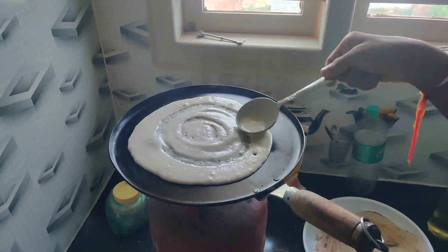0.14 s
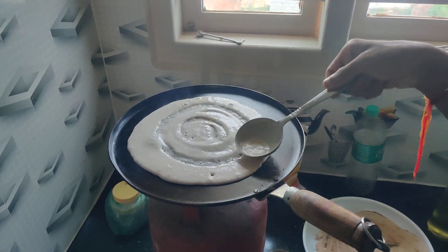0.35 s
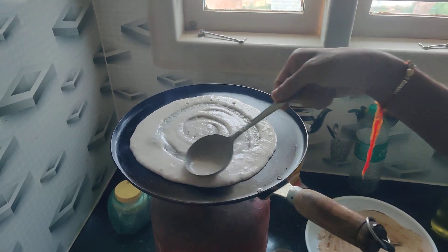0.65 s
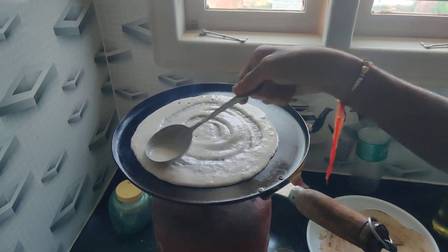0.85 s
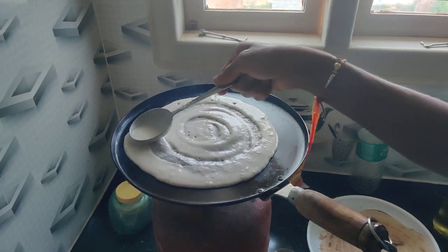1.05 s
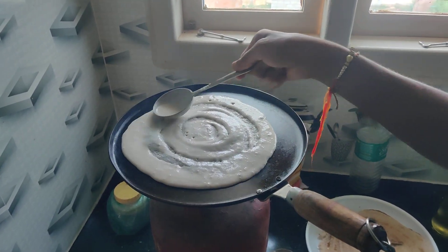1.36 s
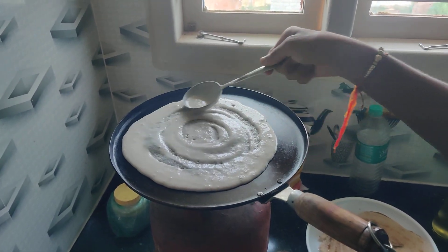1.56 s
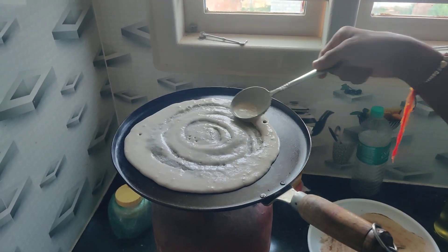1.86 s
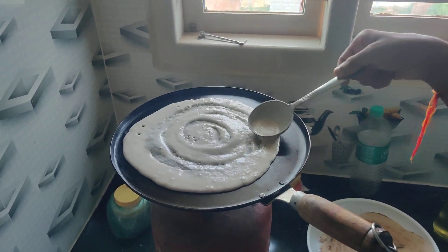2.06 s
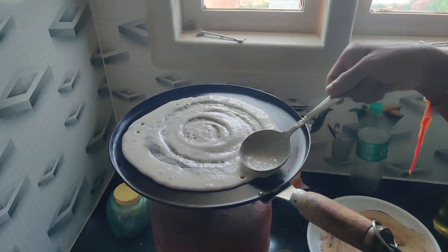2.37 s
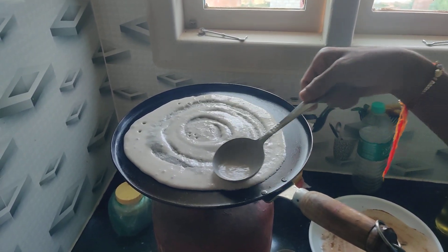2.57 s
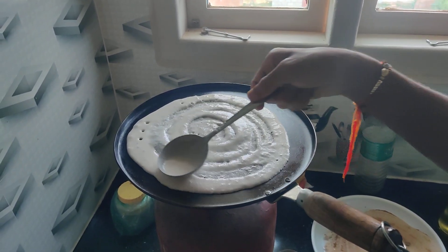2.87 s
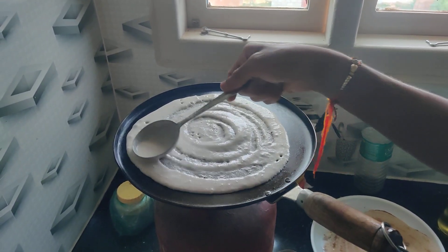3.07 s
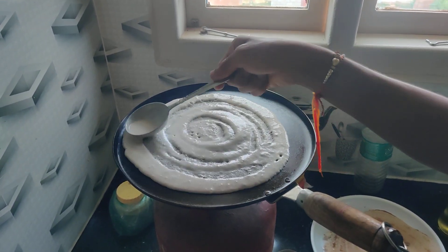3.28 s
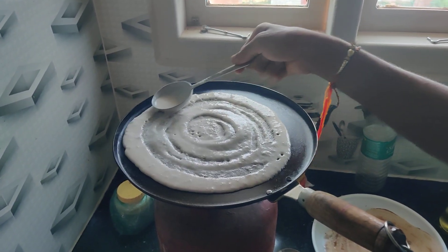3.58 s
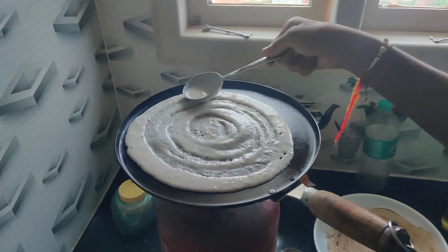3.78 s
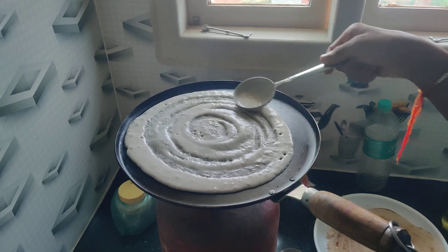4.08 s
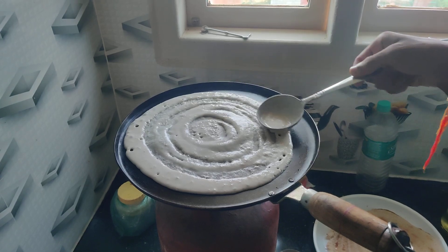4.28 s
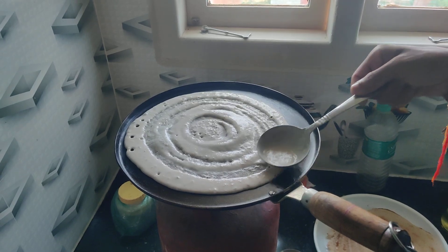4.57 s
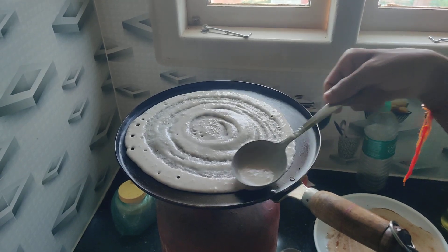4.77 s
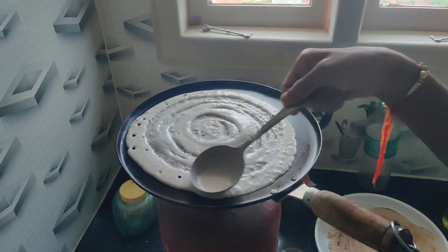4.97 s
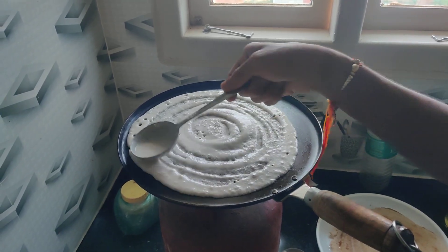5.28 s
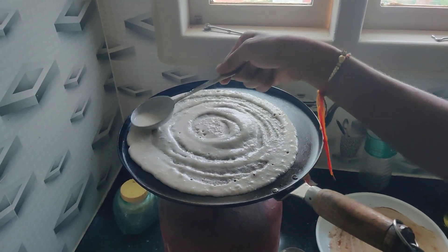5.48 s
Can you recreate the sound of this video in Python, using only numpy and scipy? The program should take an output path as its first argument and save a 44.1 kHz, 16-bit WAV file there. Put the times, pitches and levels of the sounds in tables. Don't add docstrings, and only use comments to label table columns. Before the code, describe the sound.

Close, dense frying hiss crackles and pops as a ladle circles through batter; the pan knocks and shudders on its stand over low flame roar.

```python
import sys
import numpy as np
from scipy import signal
from scipy.fft import rfft, irfft, next_fast_len
from scipy.io import wavfile
from scipy.ndimage import map_coordinates

SR = 44100
rng = np.random.default_rng(int(sys.argv[2]) if len(sys.argv) > 2 else 0)


def dump(signal):
    limited = np.clip(np.atleast_2d(signal).T, -1, 1)
    pcm = np.round(limited * 32767).astype(np.int16)
    wavfile.write(sys.argv[1], SR, pcm)


def gain_from_db(level_db):
    decades = np.asarray(level_db, float) / 20
    return 10 ** decades


N = 248503


def rms_one(x):
    return x / np.sqrt(np.mean(x ** 2) + 1e-20)


def at_hz(points, hz):
    points = np.array(points)
    return np.interp(np.log(hz + 1), np.log(points[:, 0] + 1), points[:, 1])


def drift(rate_hz):
    step, settle = 16, 3000
    r = np.exp(-2 * np.pi * rate_hz * step / SR)
    noise = rng.standard_normal(N // step + settle + 2)
    slow = signal.lfilter([1], [1, -2 * r, r * r], noise)[settle:]
    return np.interp(np.arange(N) / step, np.arange(len(slow)), rms_one(slow - slow.mean()))


def ring(x, hz, width_hz):
    r, w = np.exp(-np.pi * width_hz / SR), 2 * np.pi * hz / SR
    return signal.lfilter([0, np.sin(w)], [1, -2 * r * np.cos(w), r * r], x + 1e-18)


def strokes(starts, lengths, dbs, attack_s, t60):
    power = np.zeros(N)
    for s, length, db in zip(starts, lengths, dbs):
        first = round(s * SR)
        t = np.arange(N - first) / SR
        release_db = -60 * np.maximum(t - length, 0) / t60
        power[first:] += (np.minimum(t / attack_s, 1) * gain_from_db(db + release_db)) ** 2
    return np.sqrt(power)


# f/Hz, likeness [0..1]
LIKENESS = [(25, .96), (70, .96), (180, .88), (550, .76), (1100, .55), (2000, .36), (4500, .34),
            (9000, .32), (15000, .28)]


def coloured(pair, left, right, lag_s):
    size = next_fast_len(N)
    hz = np.arange(size // 2 + 1) * SR / size
    alike = np.clip(at_hz(LIKENESS, hz), 0, .99)
    late = map_coordinates(pair[0], [np.arange(N) - lag_s * SR], order=2)
    a, late, b = rfft([pair[0], late, pair[1]], size)
    b = alike * late + np.sqrt(1 - alike ** 2) * b
    return hz, np.array([a * gain_from_db(at_hz(left, hz)), b * gain_from_db(at_hz(right, hz))])


SIZES_HZ = [900, 2200, 3500, 5000, 7500, 14500]
# f/Hz, level/dB per Hz
SIZZLE_COLOUR = [
    [(400, -30), (760, -19.5), (1300, -17), (2300, -10), (3550, -6.5), (4200, -10.5), (4700, -2),
     (5000, 0.5), (5350, -5), (6000, -19), (8500, -17), (12500, -20.5), (14600, -20), (16000, -17.5)],
    [(400, -32.5), (760, -24.5), (1300, -23), (2400, -11.5), (3600, -10.5), (4250, -12), (4750, -7),
     (5150, -3.5), (5500, -5.5), (5900, -12.5), (8000, -19.5), (10500, -22), (13000, -21.5), (16000, -19)],
]
# f/Hz, width/Hz, lift/dB
IRON = [(1054, 27, 5), (1201, 18, 5), (1415, 22, 3), (1476, 16, 4), (1540, 27, 3), (1973, 48, 3),
        (2340, 50, 2), (2659, 65, 3), (3070, 50, 2), (3439, 54, 2.5), (3720, 50, 2), (3941, 38, 4),
        (4820, 60, 2), (5060, 60, 2)]


def sizzle():
    ladle_turn_s, lag_mean_s, lag_swing_s = 2.135, 0.00022, 0.00013
    sizzle_db, flicker_hz, flicker_db = -29.0, 11.0, 0.49
    levels = boil()
    levels = levels - 10 * np.log10(np.mean(gain_from_db(levels) ** 2, axis=1, keepdims=True))
    turns = np.arange(N) / SR / ladle_turn_s
    lag_s = lag_mean_s - lag_swing_s * np.cos(2 * np.pi * turns)
    hz, bursts = coloured(steam_bursts(.85), *SIZZLE_COLOUR, lag_s)
    lift_db = sum(db / (1 + (2 * (hz - mode_hz) / width_hz) ** 2) for mode_hz, width_hz, db in IRON)
    bursts = bursts * gain_from_db(lift_db)

    centres = np.geomspace(700, 16000, 13)
    place = np.interp(np.log(hz + 1), np.log(centres), np.arange(13))
    out, neighbour = 0, drift(flicker_hz)
    for k, centre in enumerate(centres):
        slope = np.maximum(1 - np.abs(place - k), 0)
        band = irfft(bursts * slope, next_fast_len(N))[:, :N]
        share = [np.interp(np.log(centre), np.log(SIZES_HZ), row) for row in np.eye(len(SIZES_HZ))]
        patch = drift(flicker_hz)
        out = out + band * gain_from_db(share @ levels + flicker_db * (patch + neighbour))
        neighbour = patch
    return gain_from_db(sizzle_db) * rms_one(out)


# t/s, level/dB
VIGOUR = [(0.0, -39.5), (0.159, -41), (0.48, -41.5), (0.66, -39), (1.172, -47), (1.449, -44.5),
          (1.629, -49.5), (1.732, -42), (2.38, -37.5), (2.529, -38.5), (2.745, -36), (3.099, -43),
          (3.44, -41), (4.104, -39.5), (4.736, -42.8), (5.002, -34.5), (5.34, -43.0), (5.635, -49)]
FOLLOWS = [0.46, 0.97, 1.3, 1.03, 1.09, 1.02]
# t/s, half length/s, level/dB, f/Hz
FLARES = [(0.24, .04, 3, 4770), (.4, .2, 6, 10700), (0.58, .157, 6.5, 3230), (0.678, 0.12, 9.5, 10900),
          (1.05, .15, 3.5, 10800), (1.552, 0.15, 9.5, 2660), (2.43, 0.15, 4, 2670),
          (2.786, 0.085, 6.5, 13700), (3.175, .04, 2, 4820), (3.214, 0.12, 4, 9900),
          (4.836, 0.1, 3.7, 4670), (5.117, .09, 2, 12600), (5.288, 0.067, 4, 2400),
          (5.507, 0.054, 5.4, 2880), (5.526, .054, 4, 6400)]
# t/s, half length/s, level/dB, f/Hz
SMOTHERS = [
    (1.6, 0.092, -10, 11100),
    (1.727, 0.069, -5, 2400),
    (2.419, 0.42, -4, 14400),
    (3.46, .13, -4.5, 2920),
    (3.704, 0.4, -4.5, 11300),
    (3.792, 0.28, -0.5, 2300),
    (4.396, 0.11, -3, 12800),
    (5.597, 0.014, -10, 6000),
]


def boil():
    patch_octaves = 0.49
    t = np.arange(N) / SR
    vigour_db = np.interp(t, *np.transpose(VIGOUR))
    s, half, db, hz = np.transpose(FLARES + SMOTHERS)[:, :, None]
    sizes = np.exp(-(np.log2(np.array(SIZES_HZ) / hz) / patch_octaves) ** 2) * db
    sizes[:, 0] = FOLLOWS[0] * sizes[:, 1]
    return np.outer(FOLLOWS, vigour_db) + sizes.T @ np.exp(-((t - s) / half) ** 2)


def steam_bursts(flutter_db):
    hiss = rng.standard_normal((2, N)) * gain_from_db(flutter_db * drift(12))
    snaps = np.diff(crackle(400.0, 3.4), prepend=0)
    return hiss + 1.7 * snaps + pops()


def crackle(per_s, spread_db):
    out = np.zeros((2, N + 40))
    at = np.flatnonzero(rng.random(N) < per_s / SR)
    luck = rng.random((len(at), 3))
    size = gain_from_db(spread_db * np.minimum(-np.log(luck[:, 0]), 4)) * np.sign(luck[:, 1] - .5)
    lag = (luck[:, 2] ** 2 * 24).astype(int)
    out[0, at] = size
    out[1, at + lag] = size
    return out[:, :N]


# t/s, peak level/dB
POPS = [(0.2436, -27), (0.2867, -32), (0.414, -28), (0.5586, -32), (0.627, -30), (0.8756, -33),
        (1.034, -29), (1.511, -31), (1.7215, -33), (1.874, -25), (2.1151, -23), (2.7157, -26), (2.763, -22),
        (3.028, -25), (3.188, -23), (3.2765, -31), (3.5428, -31), (3.6396, -28), (3.6902, -22),
        (4.6344, -29), (4.7003, -34), (4.767, -28), (4.8296, -29), (5.367, -24), (5.3944, -28),
        (5.4789, -26), (5.5188, -28), (5.5458, -29)]


def pops():
    decay_s, puff_n = 0.00037, 300
    out, t = np.zeros((2, N + 400)), np.arange(puff_n) / SR
    luck = rng.standard_normal((len(POPS), 2, puff_n))
    for (s, db), noise in zip(POPS, luck):
        over_db = min(db - np.interp(s, *np.transpose(VIGOUR)), 18)
        puff = noise * np.exp(-t / decay_s) * (t > 0) + (t == 0) * 1.7
        at = round((s + .0008) * SR)
        out[:, at:at + puff_n] += gain_from_db(over_db - 3.0) * puff
    return signal.sosfilt(signal.butter(2, 3000, "high", fs=SR, output="sos"), out[:, :N])


# t/s, peak level/dB, low ring level/dB re peak, high ring level/dB re peak
KNOCKS = [(0.574, -33, -5, -15), (0.624, -32.5, -11, 6), (0.643, -42, 1, -4), (0.677, -34.5, -13, -10),
          (0.727, -38, -13, -2), (0.909, -34.5, -17, 0), (0.936, -33.5, -23, 2), (0.983, -35.5, -10, 4),
          (1.074, -38.5, -12, -4), (1.163, -44.5, -7, 8.5), (1.266, -42.5, -5, 4), (1.322, -38.5, -15, -5),
          (1.357, -34, -21, 0), (1.474, -46, -1, -1)]
# f/Hz, level/dB, t60/s
GRIDDLE = [
    [(770, -3, .06), (835, -2, .06), (712, -10, .05)],
    [(438, -3, .07), (515, -7, .05), (310, -8, .05)],
    [(1052, -5, .06), (1145, -8, .05), (1200, -9, .05), (940, -9, .05)],
]
# t/s, length/s, level/dB
DRAG = [
    (0.303, 0.29, -55),
    (.55, 0.12, -43),
    (0.898, 0.14, -47.5),
    (1.25, 0.25, -49.5),
    (3.315, 0.044, -55.5),
    (4.94, .04, -56),
    (5.18, .04, -57),
]


def knocks():
    table = np.array(KNOCKS)
    at = np.round(table[:, 0] * SR).astype(int)
    strengths = table[:, 1] + np.array([0 * at, table[:, 2], table[:, 3]])
    luck = rng.standard_normal((len(at), 10))
    drag = strokes(*np.transpose(DRAG), attack_s=0.028, t60=0.98) * gain_from_db(1.3 * drift(35))
    contact = signal.windows.hann(round(0.01085 * SR))
    t = np.arange(len(contact)) / SR
    out, k = np.zeros(N), 0
    for modes, strength_db, drag_db in zip(GRIDDLE, strengths, (-12, -6, -14)):
        for hz, db, t60 in modes:
            clicks = np.zeros(N)
            clicks[at] = gain_from_db(strength_db + 2.0 * luck[:, k]) * np.sign(luck[:, k - 1])
            push = contact * np.cos(2 * np.pi * hz * t) * 2 / contact.sum()
            pushes = np.convolve(clicks, push)[len(push) // 2:][:N]
            width_hz = np.log(1000) / np.pi / t60
            out += gain_from_db(db) * ring(pushes, hz, width_hz)
            rustle = rms_one(ring(rng.standard_normal(N), hz, 2.5 * width_hz))
            out += gain_from_db(db + drag_db) * drag * rustle
            k += 1
    return out


def kitchen(x):
    t60, level_db = .2, -11
    t = np.arange(round(.3 * SR)) / SR
    tail = rng.standard_normal((2, len(t))) * gain_from_db(-60 * t / t60) * (t > .004)
    tail /= np.sqrt(np.sum(tail ** 2, axis=1, keepdims=True))
    return gain_from_db(level_db) * signal.fftconvolve(x[None], tail, axes=1)[:, :N]


# t/s, length/s, lower mode level/dB, upper mode level/dB
SHUDDER = [
    (3.793, 0.052, -52, -57),
    (3.85, 0.046, -49.5, -59),
    (3.917, 0.046, -64, -56.5),
    (4.025, 0.031, -55, -61),
    (4.935, .18, -56.5, -53),
    (5.165, .035, -57, -59),
    (5.4, .035, -63, -70),
]
# f/Hz, pitch wander/Hz
STAND = [
    (171, 5.95),
    (251, 6.2),
    (202.4, 1.9),
]


def shudder():
    attack_s, t60, linger_db, linger_t60 = 0.016, 0.22, -7.5, 1.9
    s, length, lower_db, upper_db = np.transpose(SHUDDER)
    gains = [strokes(s, length, lower_db, attack_s, t60),
             strokes(s, length, upper_db, attack_s, t60),
             strokes(s, length, linger_db + upper_db, attack_s, linger_t60)]
    out = np.zeros(N)
    for (hz, wander_hz), gain in zip(STAND, gains):
        pitch_hz = hz + wander_hz * drift(12.2)
        tone = np.sqrt(2) * np.sin(2 * np.pi / SR * np.cumsum(pitch_hz))
        rumble = rms_one(ring(rng.standard_normal(N), 1.86 * hz, 220))
        out += gain * (tone + 0.57 * rumble)
    return out


# f/Hz, level/dB per Hz
ROAR = [(7, -25), (14, -5), (22, 15), (30, -15), (45, -1), (85, -7.5), (105, -30), (160, -20), (215, -20),
        (380, -26), (435, -9), (490, -22.5), (790, -14.5), (1200, -17.5), (2000, -26.5)]
# f/Hz, left minus right level/dB
ROAR_LEAN = [(60, 6.5), (180, 16.5), (550, 1), (1650, 5), (4970, 5), (15000, 1.5)]
# f/Hz, width/Hz, level/dB
HUM = [
    (83.2, 11.7, -59.5),
    (158.5, 16, -66.5),
    (197, 2.8, -85),
]


def roar():
    roar_db = -49.5
    right = [(hz, db - at_hz(ROAR_LEAN, hz)) for hz, db in ROAR]
    _, noise = coloured(rng.standard_normal((2, N)), ROAR, right, lag_s=0.00005)
    low = gain_from_db(roar_db + 0.61 * drift(3.7)) * rms_one(irfft(noise, next_fast_len(N))[:, :N])
    hum = sum(gain_from_db(db) * rms_one(ring(rng.standard_normal(N), hz, width_hz)) for hz, width_hz, db in HUM)
    return low + hum * gain_from_db([[2.5], [-2.5]])


def scene():
    rattle = knocks()
    griddle = rattle + shudder()
    late = np.concatenate([np.zeros(8), griddle[:-8]])
    iron = np.array([griddle, late]) + kitchen(rattle)
    return sizzle() + roar() + iron * gain_from_db([[2.2], [-2.2]])


def band_limit(x):
    return signal.sosfilt(signal.butter(12, 17080, fs=SR, output="sos"), x)


def record(dry):
    top_cut = signal.ellip(14, .3, 75, 15735, fs=SR, output="sos")
    mix = signal.sosfilt(top_cut, dry)
    return band_limit(mix)


dry = scene()
out = record(dry)
dump(out)
```